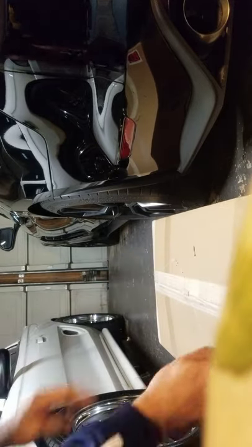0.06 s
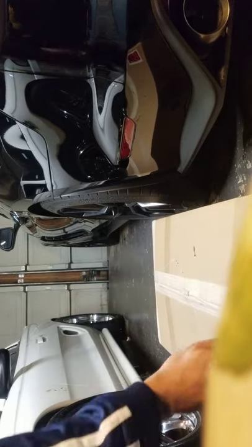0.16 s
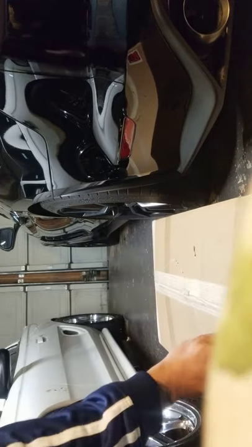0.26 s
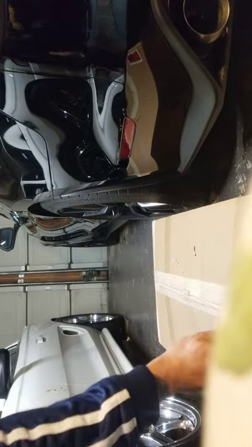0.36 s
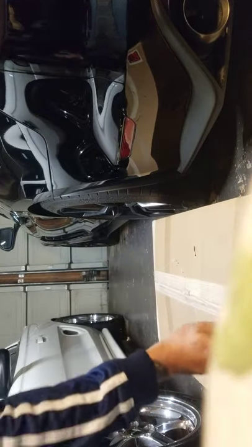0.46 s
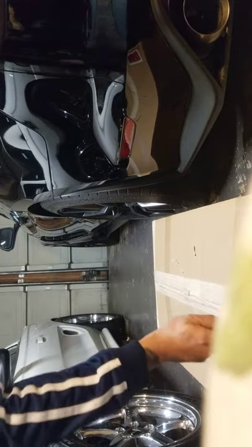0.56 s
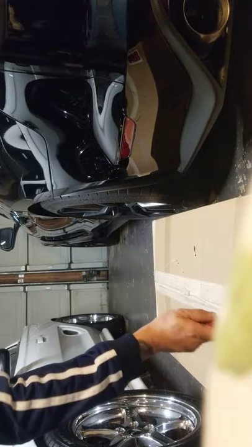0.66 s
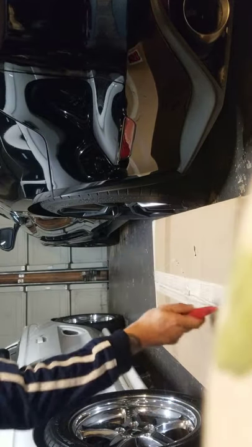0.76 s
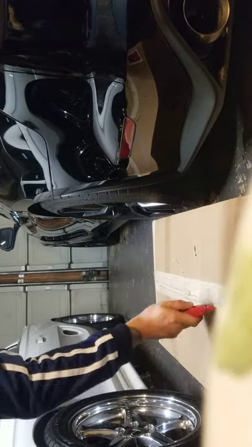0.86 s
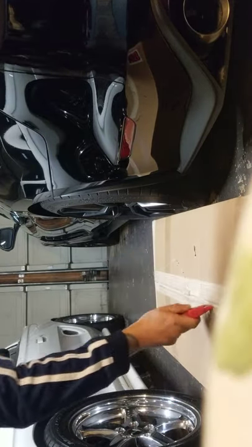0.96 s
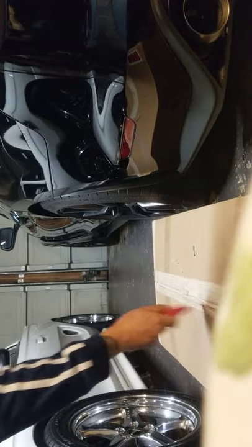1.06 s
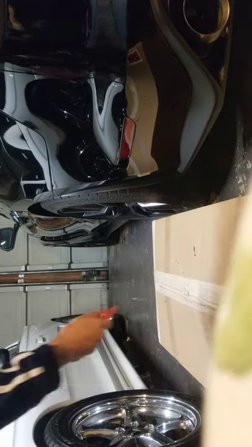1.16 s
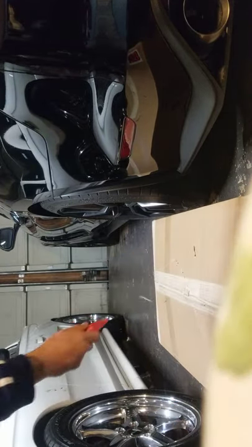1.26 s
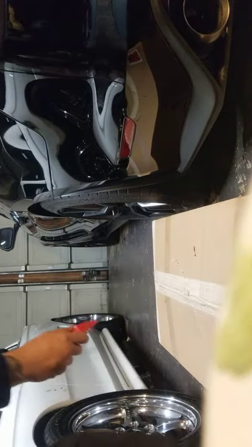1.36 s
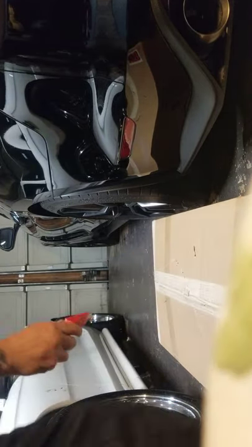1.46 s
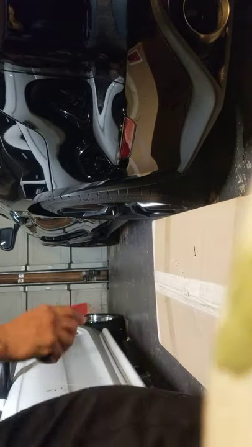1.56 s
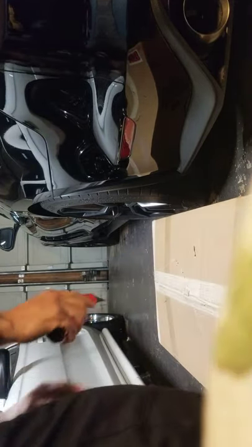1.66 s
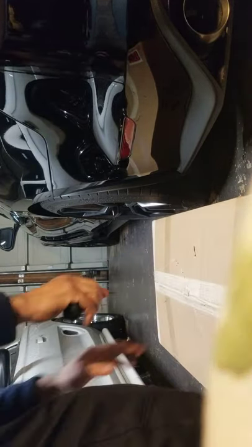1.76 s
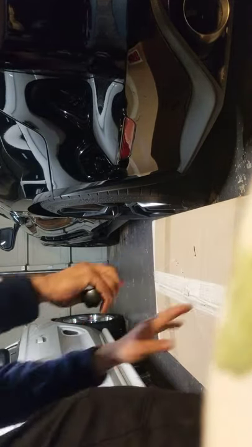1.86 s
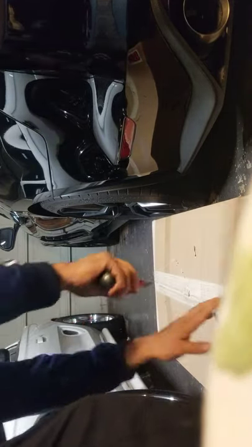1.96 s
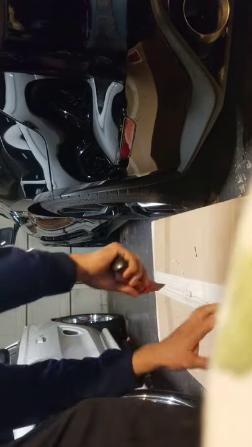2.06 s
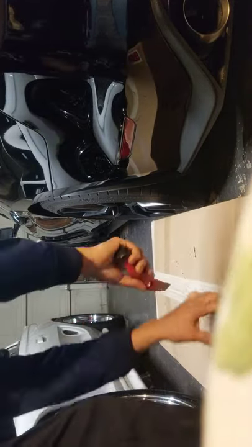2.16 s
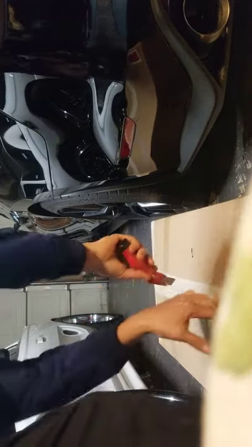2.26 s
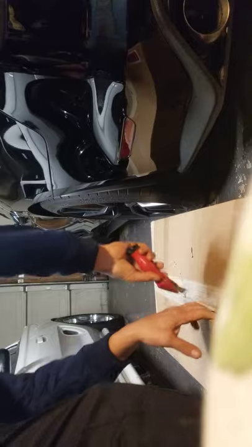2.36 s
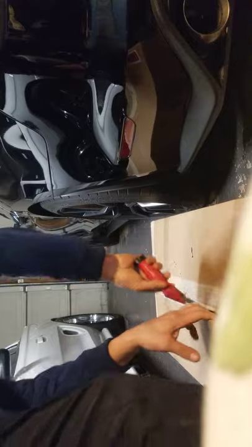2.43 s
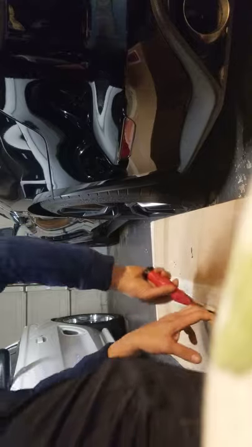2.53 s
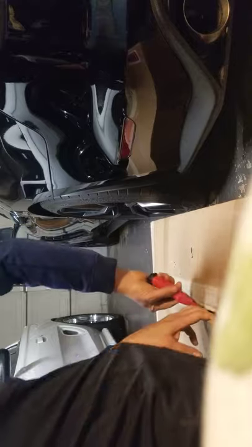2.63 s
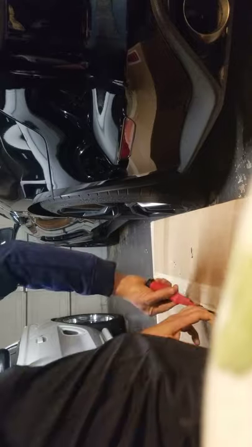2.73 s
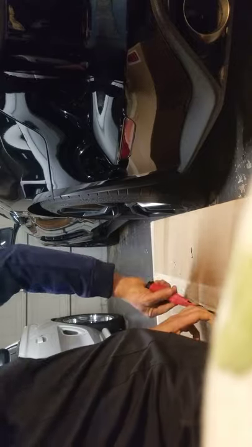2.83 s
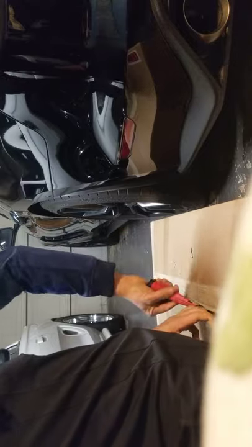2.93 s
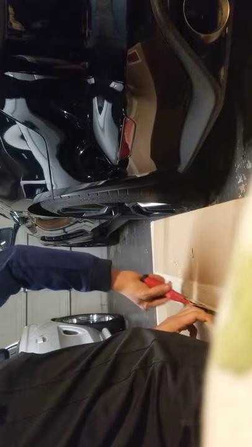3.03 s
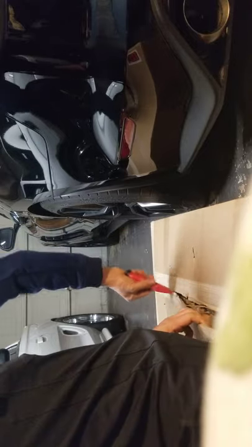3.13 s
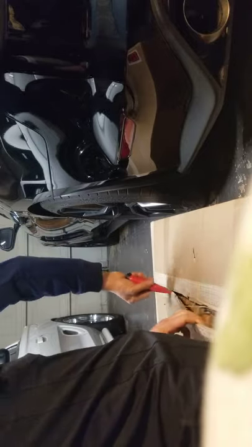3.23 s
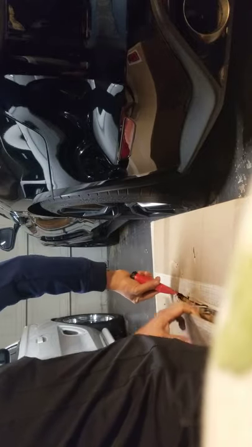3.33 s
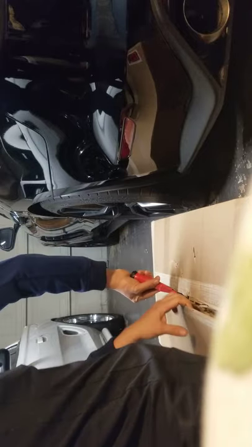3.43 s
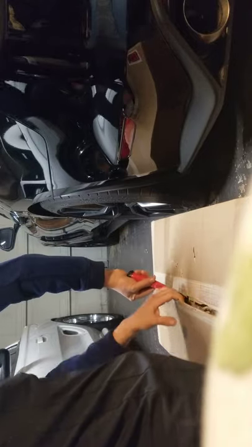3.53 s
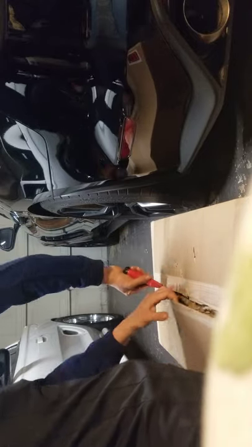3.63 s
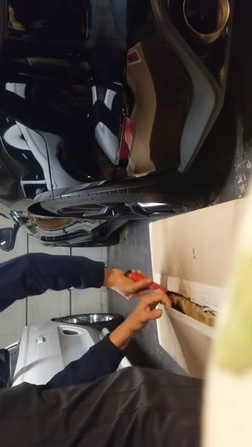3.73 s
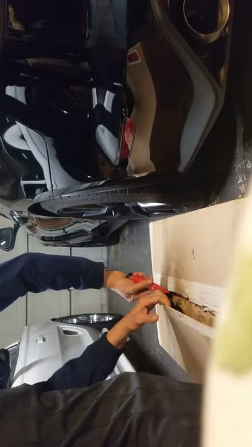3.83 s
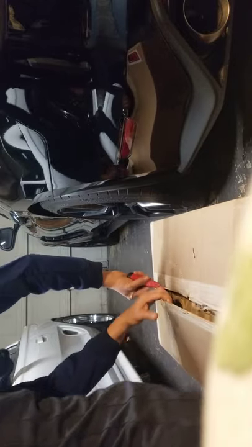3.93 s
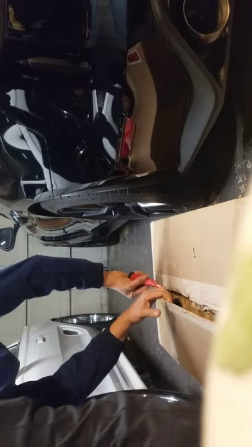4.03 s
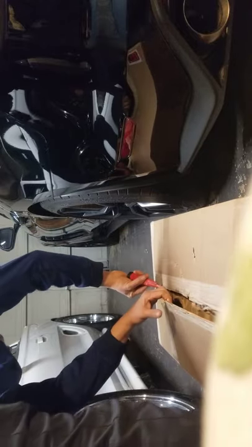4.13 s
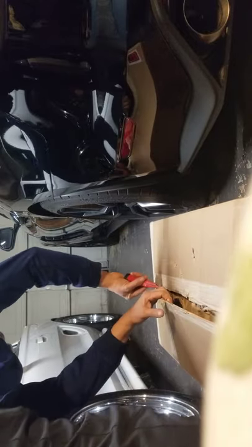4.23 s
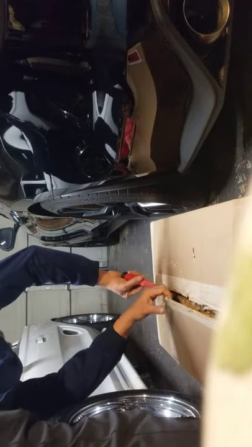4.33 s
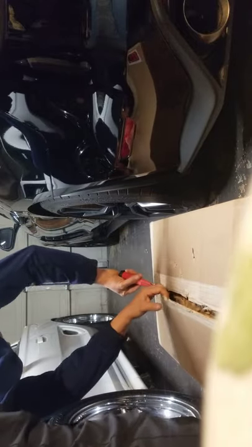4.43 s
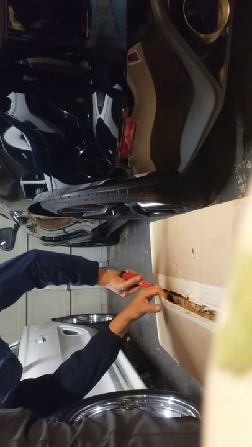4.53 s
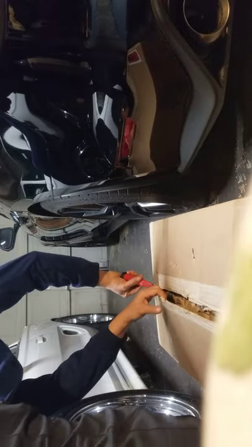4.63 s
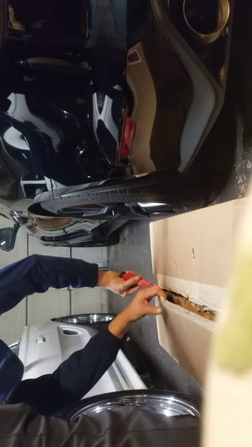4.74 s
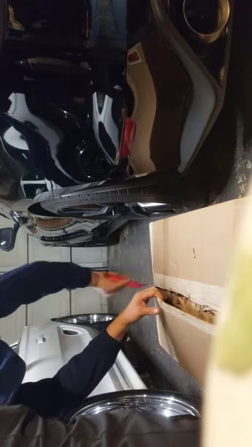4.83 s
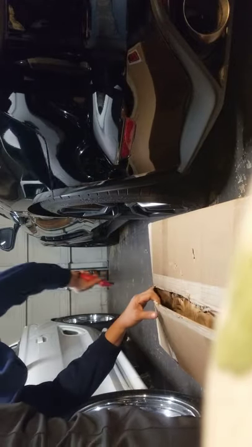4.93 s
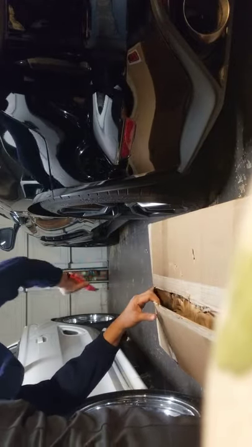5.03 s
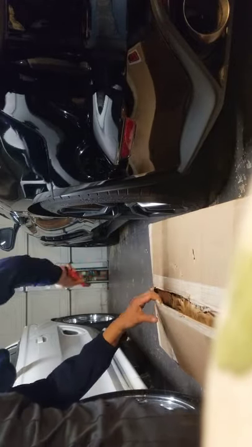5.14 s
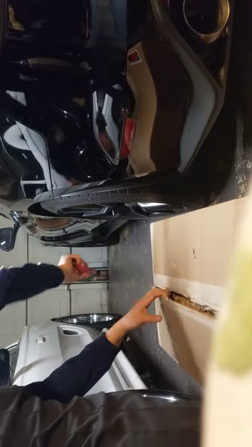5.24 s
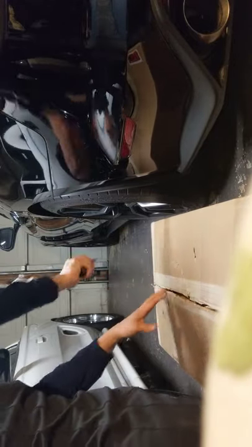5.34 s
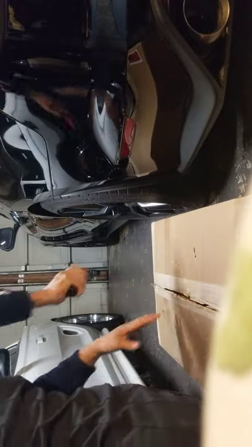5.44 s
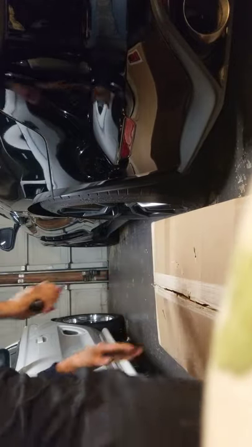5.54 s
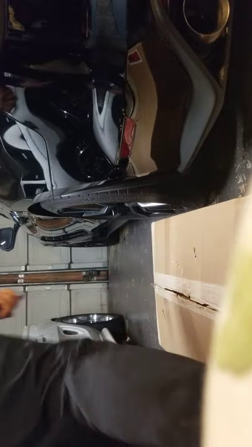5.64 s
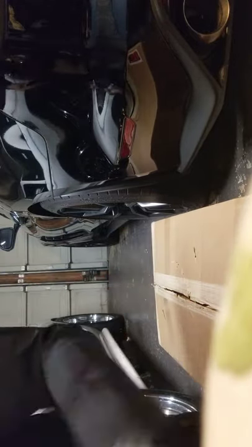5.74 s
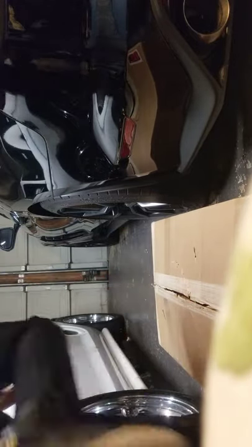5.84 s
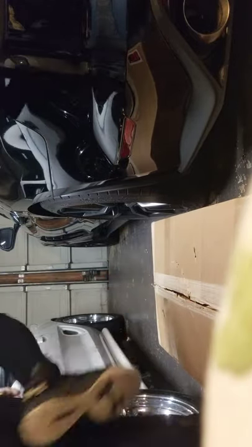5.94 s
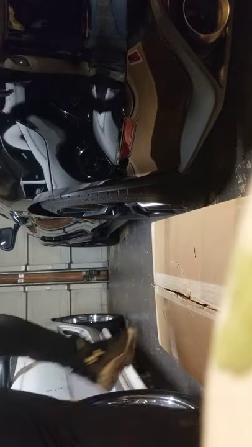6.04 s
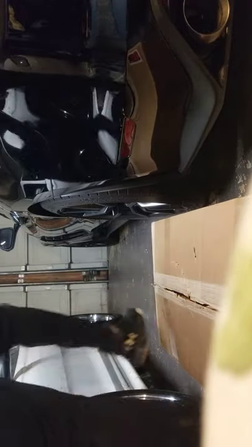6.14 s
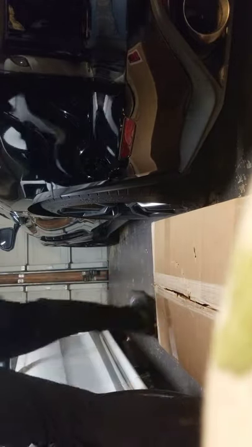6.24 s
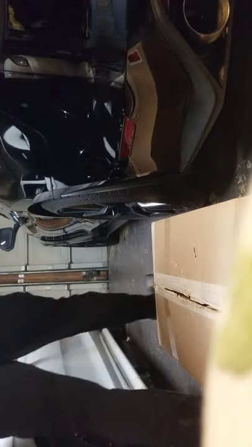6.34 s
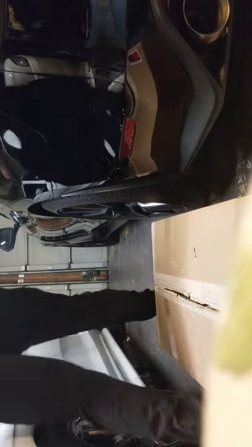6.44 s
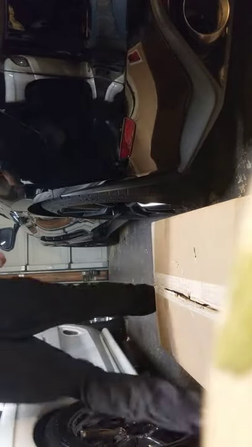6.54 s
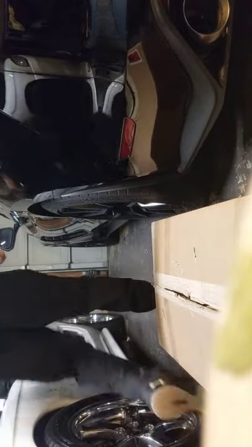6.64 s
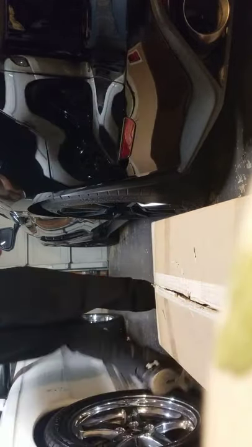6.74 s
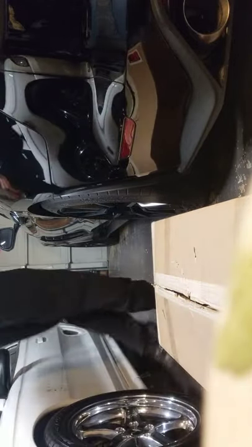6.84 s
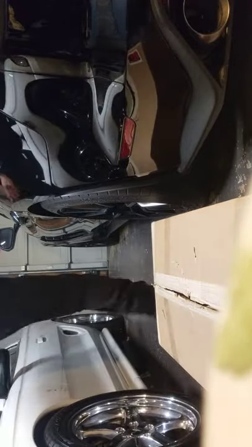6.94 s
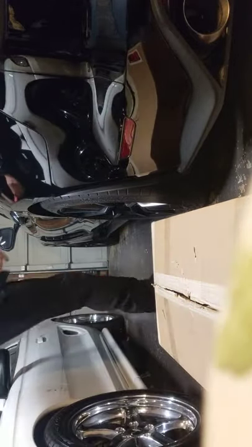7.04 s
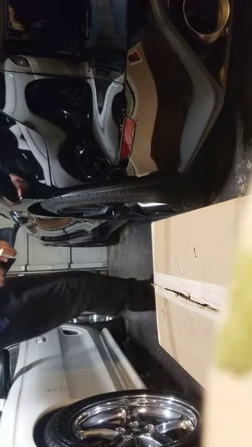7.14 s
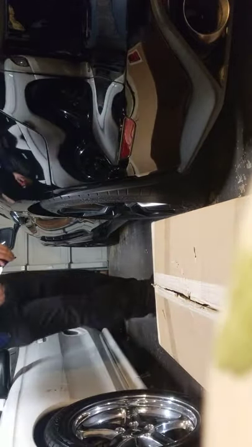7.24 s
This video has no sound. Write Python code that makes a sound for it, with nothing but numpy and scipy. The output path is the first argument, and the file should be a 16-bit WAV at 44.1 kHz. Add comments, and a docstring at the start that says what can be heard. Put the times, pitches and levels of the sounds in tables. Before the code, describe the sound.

In a hard-walled garage with a faint fan hum, a sleeve brushes and soft knocks touch a hollow cardboard box. A blade rasps briefly along its taped seam and the edge pops. After a quiet gap, hands pry the flaps: gritty rubs, sharp fibre snaps and low boxy booms come in irregular bursts. A small squeak, light shoe taps and a faint scuff finish. Close stereo microphone, short bright reverberation.

```python
"""Over a faint fan hum, a sleeve brushes and soft knocks lead into a blade rasping along a taped box seam.
The edge pops; a hand pries the flaps, which rub, rip in snaps and boom. Late: squeaks, shoe taps, a scuff.
Stick-slip grains (cuts, pulls) and click showers (snaps, knocks, steps) drive coloured cracks and resonances.
Sleeves and scuff are coloured grains; squeaks, fan and air are filtered noise; a thin whine is a jittered sine.
Echoes and band-wise decaying noise make a hard-walled garage around box and person."""
import sys
import numpy as np
from scipy import signal
from scipy.fft import rfft, irfft, next_fast_len
from scipy.io import wavfile
from scipy.ndimage import uniform_filter1d

SR = 44100
rng = np.random.default_rng(int(sys.argv[2]) if len(sys.argv) > 2 else 0)


def dump(signal):
    """Clip the signal to [-1, 1] and save it as 16-bit WAV at the path in sys.argv[1]."""
    limited = np.clip(np.atleast_2d(signal).T, -1, 1)
    pcm = np.round(limited * 32767).astype(np.int16)
    wavfile.write(sys.argv[1], SR, pcm)


N = 321489
TIME = np.arange(N) / SR

# Levels of strokes and blows are relative: each source adds its own offsets.
# blade strokes: (start [s], length [s], swell over stroke [dB], rasp [dB], panel [dB], boom [dB])
CUT_STROKES = [ (0.37, 0.068, 11, -49.5, -41.5, -36), (0.495, 0.315, 0.5, -36, -27.5, -32),
               (1.045, 0.039, 3, -35, -25, -22.5), ]
# flaps pulled, rubbing and tearing: (start [s], length [s], swell [dB], rasp [dB], panel [dB], boom [dB])
PULL_STROKES = [ (1.995, 0.12, 4, -43, -43, -34), (2.15, 0.047, 0, -38.5, -31.5, -29),
                (2.66, 0.038, -5, -35.5, -43, -28), (2.735, 0.036, 0.5, -37.5, -37.5, -27.5),
                (2.965, 0.022, 0, -38, -38, -26), (3.075, 0.082, -4, -26, -18, -27),
                (3.27, 0.35, 6.5, -43, -45, -39.5), (3.645, 0.068, -1.5, -33.5, -25, -29),
                (3.92, 0.052, -6, -42, -30.5, -23), (4.015, 0.036, -6, -38, -29.5, -16),
                (4.315, 0.13, 3, -41, -56, -39), (4.765, 0.072, 5.5, -30.5, -19, -39),
                (5.21, 0.063, -11, -45, -52, -60), (5.295, 0.041, 5.5, -33.5, -39.5, -25), ]
# fibres and tape giving way:
# (time [s], crack [dB], panel [dB], boom [dB], contact pitch [Hz], shower decay [s])
SNAP_BLOWS = [ (0.3733, -46, -58, -37, 202, 0.0024), (2.2063, -18.5, -16.5, -21, 463, 0.0038),
              (2.529, -25, -26.5, -21, 320, 0.041), (2.9906, -16, -17, -15.5, 510, 0.014),
              (3.0455, -12, -13, -12.5, 523, 0.0066), (3.7165, -14.5, -14, -16, 238, 0.0058),
              (3.752, -19.5, -12, -37, 230, 0.004), (3.798, -14.5, -23, -28, 372, 0.016),
              (4.5255, -19.5, -19, -21, 364, 0.0028), (4.756, -21.5, -19.5, -16.5, 222, 0.02),
              (4.835, -21, -20.5, -20.5, 270, 0.026), ]
# hand and knife on the box:
# (time [s], crack [dB], panel [dB], boom [dB], contact pitch [Hz], shower decay [s])
KNOCK_BLOWS = [ (0.153, -48, -38, -39, 216, 0.0071), (0.193, -43, -42.5, -38, 442, 0.02),
               (0.2575, -29, -34, -22.5, 285, 0.01), (1.3366, -28.5, -36, -36.5, 350, 0.016),
               (1.730, -56, -37.5, -41, 280, 0.029), (1.967, -37.5, -50, -29.5, 230, 0.0072),
               (1.985, -27, -43, -28.5, 200, 0.007), (3.405, -34.5, -42, -53, 720, 0.0028),
               (4.316, -45, -35.5, -34.5, 200, 0.0042), (4.4625, -28.5, -27.5, -29, 450, 0.007),
               (5.292, -34, -36, -44, 250, 0.013), ]
# shoes on concrete: (time [s], tap [dB], knock [dB], thud [dB], contact pitch [Hz], shower decay [s])
STEP_BLOWS = [ (6.204, -40.5, -34.5, -39.5, 231, 0.0049), (6.374, -54, -34, -29.5, 165, 0.027),
              (6.995, -35.5, -44, -62, 710, 0.0058), ]
# sleeves brushing: (start [s], length [s], swell [dB], level [dB])
SLEEVE_STROKES = [ (0.0, 0.047, -6, -61), (1.565, 0.066, 0, -58.5), (1.733, 0.027, -11, -50),
                  (5.55, 0.033, 2, -45.5), (5.791, 0.0084, -19.5, -45), (5.97, 0.63, 0, -70), ]
# sole sliding: (start [s], length [s], swell [dB], level [dB])
SCUFF_STROKES = [(6.985, 0.26, -15, -49.5)]
# box wall bowing under the hand: (time [s], level [dB])
WALL_FLEXES = [(0.70, -19), (0.883, -25), (1.10, -20.5), (2.758, -26), (3.21, -35), (4.11, -36.5)]
# brief squeaks of tape and sole: (start [s], length [s], pitch [Hz], level [dB])
SQUEAK_TONES = [(5.335, 0.066, 3670, -50), (6.157, 0.004, 6200, -70), (6.16, 0.02, 5600, -72)]

# blade rasp spectrum: (frequency [Hz], density [dB per Hz])
BLADE_SPECTRUM = [(350, -29), (700, -8), (1100, -8), (1700, -13.5), (2700, -13), (3700, -15), (4900, -12),
                  (6500, -17), (7900, -15.5), (9300, -50), (11500, -12.5), (13200, -40), (14200, -25),
                  (16000, -35)]
# flap rubbing spectrum: (frequency [Hz], density [dB per Hz])
RUB_SPECTRUM = [(410, -15), (700, -3), (863, -5.5), (1230, -9), (1710, -13), (1800, -12), (1940, -10),
                (2130, -8.5), (4260, -12), (5990, -9), (9350, -19.5), (12800, -15.5), (16000, -32)]
# snap crack spectrum: (frequency [Hz], density [dB per Hz])
SNAP_SPECTRUM = [(300, -34), (650, 3), (1050, -4.5), (1400, -4), (1950, -7.5), (2400, -8.5), (3200, -14.5),
                 (3900, -10.5), (6000, -10), (7700, -14), (9300, -24.5), (13100, -16), (16000, -55)]
# knock and shoe tap spectrum: (frequency [Hz], density [dB per Hz])
KNOCK_SPECTRUM = [(350, -36.5), (750, 0.5), (1100, -9.5), (2000, -9), (3500, -13.5), (6500, -12),
                  (9000, -22.5), (13000, -18), (16000, -51)]
# scuff spectrum: (frequency [Hz], density [dB per Hz])
SCUFF_SPECTRUM = [(250, -8), (500, -9), (750, -5), (1200, -18), (1900, -10.5), (2900, -9.5), (4000, -15),
                  (7000, -16.5), (9500, -25), (12700, -22), (16000, -37)]
# sleeve spectrum: (frequency [Hz], density [dB per Hz])
SLEEVE_SPECTRUM = [(1500, -10), (3500, -2.5), (6000, 1), (10000, -2.5), (13500, -2), (16000, -15)]
# room air spectrum: (frequency [Hz], density [dB per Hz])
AIR_SPECTRUM = [(15, -28), (25, -10.5), (70, 0), (149, -12), (175, -12), (206, -11), (270, -5.5),
                (363, -13.5), (416, -18.5), (818, -19.5), (962, -26), (1890, -25), (9070, -51),
                (14800, -39), (16000, -47)]

# lowest resonances of the box: (frequency [Hz], width [Hz], level [dB])
BOX_BOOM_MODES = [(63.9, 10.2, 8.5), (77.3, 14.8, 2), (119, 11.2, -0.5)]
# resonances of the cardboard panels: (frequency [Hz], width [Hz], level [dB])
BOX_PANEL_MODES = [(167.6, 51, -0.5), (210.8, 17.4, 6.5), (238, 6.8, 3), (282.4, 28.6, 1.5), (312, 26, 0),
                   (371, 45, -6.5), (487, 55, 3.5), (581, 23.4, -13), (690, 38, -9.5), (713, 670, -5.5)]
# resonances of a step's knock: (frequency [Hz], width [Hz], level [dB])
STEP_KNOCK_MODES = [(138, 47, -22), (238, 25, 4), (297, 24, 3.5), (580, 73, 0.5)]
# resonance of a step's thud: (frequency [Hz], width [Hz], level [dB])
STEP_THUD_MODES = [(81.4, 13, 0)]

# fan tones: (frequency [Hz], relative level [dB])
FAN_TONES = [(242.2, -56.5), (269.2, -95), (312.2, -63), (360.7, -66.5)]
# mean pitch of the whine: (time [s], frequency [Hz])
WHINE_PITCH = [(0, 15100), (1.6, 15100), (2.8, 15250), (4.0, 15600), (4.7, 15750), (5.6, 15400),
               (6.6, 15200), (7.29, 15250)]
# garage decay: (frequency [Hz], T60 [s])
GARAGE_T60 = [(60, 0.14), (200, 0.2), (500, .5), (1500, 0.77), (5000, 0.82), (9000, 0.63), (15000, 0.28)]
# garage balance: (frequency [Hz], reverberant over direct [dB])
GARAGE_WET = [(60, -3.5), (150, -12), (400, -0.5), (1200, 6), (5000, 7.5), (14000, 6)]
# stereo balance: (frequency [Hz], left minus right [dB])
STEREO_LEAN = [(60, 0.5), (150, -1.3), (700, 2), (3000, 1.7), (5000, 2), (8000, -1), (13000, -2)]
# floor and car bodies: (delay left [s], delay right [s], level [dB])
FIRST_ECHOES = [(.0031, 0.0031, -15.5), (.0099, 0.008, -8), (0.0156, .0151, -10)]

PORT_SPACING_M, SOUND_SPEED_M_S = 0.17, 343
WAVER_DB, WAVER_S = 2.54, 0.0089  # rms of uneven hand pressure; time constant of each smoothing
FLEX_S = 0.016  # first give to strongest push
POP_AT_S, POP_HZ, POP_WIDTH_HZ, POP_DB = 1.3368, 453, 205, -12.5
REBOUND_S, REBOUND_HZ, REBOUND_LENGTH_S = 0.018, 202, 0.0082
REBOUND_CRACK_DB, REBOUND_PANEL_DB, REBOUND_BOOM_DB = -20.5, -11, -5  # relative to the snap


def from_db(db):
    """Decibels to gain."""
    return 10 ** (np.asarray(db) / 20)


def rms_one(x):
    """Scale to unit rms."""
    return x / np.sqrt(np.mean(x ** 2) + 1e-20)


def at_hz(points, hz):
    """Read a table on a log-frequency axis."""
    f, value = np.transpose(points)
    return np.interp(np.log(np.maximum(hz, 1)), np.log(f), value)


def die_away(age):
    """Full gain before age 0, then an exponential fade; age counts time constants."""
    return np.exp(-np.clip(age, 0, 20))


def linger(x, seconds):
    """One-pole smoothing with the given time constant."""
    r = np.exp(-1 / (seconds * SR))
    return signal.lfilter([1 - r], [1, -r], x + 1e-18)


def steady(x, span_s):
    """Even out slow swells, keeping the grain."""
    span = int(span_s * SR) + 1
    power = uniform_filter1d(uniform_filter1d(x * x, span), span)
    return x / np.sqrt(np.abs(power) + 1e-14)


def colour(x, spectrum, size=4096):
    """Causal minimum-phase filter with the given spectrum, by cepstral folding."""
    log_gain = np.log(from_db(at_hz(spectrum, np.fft.rfftfreq(size, 1 / SR))))
    cepstrum = irfft(log_gain)
    cepstrum[1:size // 2] *= 2
    cepstrum[size // 2 + 1:] = 0
    impulse = irfft(np.exp(rfft(cepstrum)))
    return signal.oaconvolve(x, impulse)[:len(x)]


def resonate(x, modes):
    """Parallel two-pole resonances of alternating sign."""
    out = 0
    for k, (hz, width_hz, db) in enumerate(modes):
        r = np.exp(-np.pi * width_hz / SR)
        poles = [1, -2 * r * np.cos(2 * np.pi * hz / SR), r * r]
        ring = signal.lfilter([1, 0, -1], poles, x + 1e-18)
        out = out + (-1) ** k * from_db(db) * (1 - r * r) / 2 * ring
    return out


def contact(force, hz):
    """A contact of limited duration favours the modes around one pitch."""
    band = signal.butter(1, [hz / 1.5, hz * 1.5], "band", fs=SR, output="sos")
    return signal.sosfilt(band, force)


def grains(per_s, spread_db, size=N):
    """Tiny random clicks of uneven strength and random sign."""
    strength = from_db(spread_db * np.minimum(rng.exponential(1, size), 4))
    return (rng.random(size) < per_s / SR) * strength * rng.choice([-1, 1], size)


def diffuse_pair(size):
    """Spectra of noise arriving from all sides at two ports: alike in the bass only."""
    alike = np.sinc(2 * np.fft.rfftfreq(size, 1 / SR) * PORT_SPACING_M / SOUND_SPEED_M_S)
    mid, side = rfft(rng.standard_normal((2, size)))
    return np.sqrt(1 + alike) * mid + np.sqrt(1 - alike) * side * [[1], [-1]]


def stroke_gain(strokes, attack_s, release_s, column=0):
    """Each stroke sets in, swells or eases while it lasts and dies away; the pressure wavers throughout."""
    power = np.zeros(N)
    for start_s, length_s, swell_db, *levels_db in strokes:
        t = TIME - start_s
        progress = np.clip(t / length_s, 0, 1)
        hold = from_db(levels_db[column] + swell_db * (progress - .5))
        onset = die_away(-t / attack_s)
        release = die_away((t - length_s) / release_s)
        power += (onset * hold * release) ** 2
    waver = rms_one(linger(linger(rng.standard_normal(N), WAVER_S), WAVER_S))
    return np.sqrt(power) * from_db(WAVER_DB * waver)


def blows(rows, spectrum, body_modes, low_modes, hard_hz, crumble, crack_db, body_db, low_db, size=16384):
    """Each blow is one release, sharper for harder contact, plus a dying click shower: crack, body, bass."""
    out = np.zeros(N + size)
    t = np.arange(size) / SR
    release = np.exp(-2 * np.pi * hard_hz * np.minimum(t, .005))
    for time_s, crack, body, low, contact_hz, length_s in rows:
        shower = grains(3000, 5.0, size) * np.exp(-t / max(length_s, .001))
        force = release / release.sum() + crumble * shower / (np.linalg.norm(shower) + 1e-12)
        parts = [
            (colour(force, spectrum), crack + crack_db),
            (resonate(contact(force, contact_hz), body_modes), body + body_db),
            (resonate(force, low_modes), low + low_db),
        ]
        first = int(time_s * SR)
        for part, db in parts:
            out[first:first + size] += from_db(db) * rms_one(part)
    return out[:N]


def scrape(strokes, attack_s, release_s, spectrum, slips_per_s, jitter, slip_s, fibres_per_s, spread_db,
           drag, contact_hz, rasp_db, panel_db, boom_db):
    """The board sticks and slips over its flutes; each slip breaks a few fibres and kicks the box."""
    chance = rng.standard_normal((4000, 2))
    gaps_s = np.exp(jitter * chance[:, 0]) / slips_per_s  # rate of the median gap
    at = (np.cumsum(gaps_s) * SR).astype(int)
    slips = np.zeros(N)
    slips[at[at < N]] = from_db(spread_db * chance[at < N, 1])
    effort = rms_one(linger(slips, slip_s))
    fibres = rms_one(grains(fibres_per_s, spread_db) * (drag + effort))
    force = rms_one(slips) + fibres

    rasp = steady(colour(fibres, spectrum), 0.025)  # fibres radiate directly
    panel = steady(resonate(contact(force, contact_hz), BOX_PANEL_MODES), 0.013)
    boom = steady(resonate(force, BOX_BOOM_MODES), 0.074)
    out = np.zeros(N)
    for column, (part, db) in enumerate([(rasp, rasp_db), (panel, panel_db), (boom, boom_db)]):
        out += part * from_db(db) * stroke_gain(strokes, attack_s, release_s, column)
    return out


def room_air():
    """Diffuse noise at two ports, coloured as room air."""
    noise = irfft(diffuse_pair(next_fast_len(2 * N)))[:, :N]
    return from_db(-49.45) * rms_one(np.array([colour(side, AIR_SPECTRUM) for side in noise]))


def fan():
    """Noise through 3 Hz wide resonances gives wavering tones."""
    return sum(from_db(db - 4.0) * rms_one(resonate(rng.standard_normal(N), [(hz, 3, 0)]))
               for hz, db in FAN_TONES)


def whine():
    """A high sine on a gliding pitch, its frequency jittered at every sample in each channel."""
    hz = np.interp(TIME, *np.transpose(WHINE_PITCH)) + 1200 * rng.standard_normal((2, N))
    return from_db(-77) * np.sin(2 * np.pi * np.cumsum(hz, axis=1) / SR)


def sleeves():
    """Dense cloth grains hiss as sleeves brush."""
    hiss = rms_one(colour(grains(7000, 1.9), SLEEVE_SPECTRUM))
    return from_db(-2.0) * stroke_gain(SLEEVE_STROKES, attack_s=0.0045, release_s=0.0097) * hiss


def knocks():
    """Hand and knife strike the hollow box with a soft contact."""
    return blows(KNOCK_BLOWS, KNOCK_SPECTRUM, BOX_PANEL_MODES, BOX_BOOM_MODES, hard_hz=1307.5, crumble=0.83,
                 crack_db=-21.5, body_db=-12.5, low_db=-11.5)


def cuts():
    """The blade rasps through the seam by stick and slip."""
    return scrape(CUT_STROKES, attack_s=0.02, release_s=0.017, spectrum=BLADE_SPECTRUM,
                  slips_per_s=170, jitter=.6, slip_s=0.0027, fibres_per_s=2000, spread_db=2.5, drag=0.46,
                  contact_hz=268, rasp_db=3.5, panel_db=-1.0, boom_db=-1.0)


def rebounds(snaps):
    """After each snap the freed flap springs back with a duller, weaker blow."""
    return [(time_s + REBOUND_S, crack + REBOUND_CRACK_DB, panel + REBOUND_PANEL_DB,
             boom + REBOUND_BOOM_DB, REBOUND_HZ, REBOUND_LENGTH_S)
            for time_s, crack, panel, boom, _, _ in snaps]


def snaps():
    """Fibres and tape give way sharply, then the flap rebounds."""
    return blows(SNAP_BLOWS + rebounds(SNAP_BLOWS), SNAP_SPECTRUM, BOX_PANEL_MODES, BOX_BOOM_MODES,
                 hard_hz=9100, crumble=0.7, crack_db=-17, body_db=-13.5, low_db=-15.5)


def flexes():
    """A bowing wall swells and fades in the lowest modes of the box only."""
    gain = np.zeros(N)
    for time_s, db in WALL_FLEXES:
        age = np.clip((TIME - time_s) / FLEX_S, 0, 20)
        gain += from_db(db) * age * np.exp(1 - age)
    return gain * steady(resonate(rng.standard_normal(N), BOX_BOOM_MODES), 0.063)


def edge_pop():
    """The blade jumps out at the seam's end; the taut edge pops as a fast-decaying sine."""
    t = np.maximum(TIME - POP_AT_S, 0)
    return from_db(POP_DB) * np.sin(2 * np.pi * POP_HZ * t) * die_away(np.pi * POP_WIDTH_HZ * t)


def pulls():
    """Pried flaps rub and tear by stick and slip."""
    return scrape(PULL_STROKES, attack_s=0.025, release_s=0.0096, spectrum=RUB_SPECTRUM,
                  slips_per_s=140, jitter=.7, slip_s=0.0026, fibres_per_s=6000, spread_db=4.0, drag=0.25,
                  contact_hz=213, rasp_db=-4.5, panel_db=-3.5, boom_db=-6.0)


def squeaks():
    """Friction catches and sings at one rough pitch: noise in a 60 Hz wide resonance, fading briefly."""
    out = 0
    for start_s, length_s, hz, db in SQUEAK_TONES:
        tone = rms_one(resonate(rng.standard_normal((2, N)), [(hz, 60, 0)]))
        out = out + tone * stroke_gain([(start_s, length_s, 0, db)], attack_s=0.002, release_s=0.039)
    return out


def steps():
    """Shoes land on concrete: tap, knock and thud."""
    return blows(STEP_BLOWS, KNOCK_SPECTRUM, STEP_KNOCK_MODES, STEP_THUD_MODES, hard_hz=1000, crumble=1.0,
                 crack_db=-24.5, body_db=-16.0, low_db=-11)


def scuff():
    """A sole drags over grit: sparse, uneven grains."""
    grit = rms_one(colour(grains(1500, 4.7), SCUFF_SPECTRUM))
    return from_db(0.5) * stroke_gain(SCUFF_STROKES, attack_s=0.019, release_s=0.03) * grit


def reflections(x):
    """Direct sound at both ports and its first echoes; the bass bends around the reflectors."""
    ports = np.array([np.roll(x, 2), x])  # right port slightly nearer
    bright = signal.sosfilt(signal.butter(1, 494, "high", fs=SR, output="sos"), x)
    for left_s, right_s, db in FIRST_ECHOES:
        ports += from_db(db) * np.array([np.interp(TIME - s, TIME, bright) for s in (left_s, right_s)])
    return ports


def garage(x, build_s, early_share, early_s, count=25):
    """Direct sound, then echoes blurred into noise: each band's energy lingers and dies."""
    edges_hz = np.geomspace(50, 17000, count + 1)
    fields = irfft(diffuse_pair(next_fast_len(2 * N)))[:, :2 * N].reshape(2, 2, N)
    direct_db = [(hz, -10 * np.log10(1 + from_db(db) ** 2)) for hz, db in GARAGE_WET]
    direct = colour(x, direct_db)
    out = reflections(direct)
    for k, (low, high) in enumerate(zip(edges_hz, edges_hz[1:])):
        hz = np.sqrt(low * high)
        band = signal.butter(2, [low, high], "band", fs=SR, output="sos")
        energy = linger(signal.sosfilt(band, direct + 1e-18) ** 2, build_s)
        early = linger(energy, early_s)  # scatter off the cars and the floor
        late = linger(energy, at_hz(GARAGE_T60, hz) / np.log(1e6))  # T60 to energy time constant
        echoes = rms_one(signal.sosfilt(band, fields[:, k % 2]))
        envelope = np.sqrt(early_share * early + (1 - early_share) * late)
        out += from_db(at_hz(GARAGE_WET, hz)) * envelope * echoes
    return np.array([colour(side, [(hz, sign * db / 2) for hz, db in STEREO_LEAN])
                     for side, sign in zip(out, (1, -1))])


def scene():
    """Box and person in the garage; squeaks and background are added outside its reverberation."""
    box = knocks() + cuts() + snaps() + flexes() + edge_pop() + pulls()
    person = sleeves() + steps() + scuff()
    room = garage(box + person, build_s=0.00028, early_share=0.79, early_s=0.027)
    return room + squeaks() + room_air() + fan() + whine()


def record(dry):
    """The microphone drops bass below 40 Hz; the top is cut at 15950 Hz."""
    thin = signal.sosfilt(signal.butter(4, 40, "high", fs=SR, output="sos"), dry)
    return signal.sosfilt(signal.ellip(10, .2, 80, 15950, fs=SR, output="sos"), thin)


dry = scene()
out = record(dry)
dump(out)
```